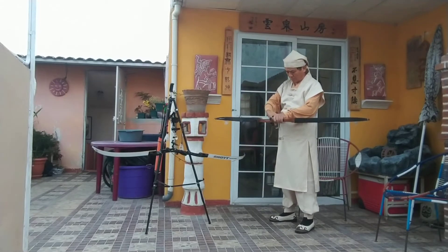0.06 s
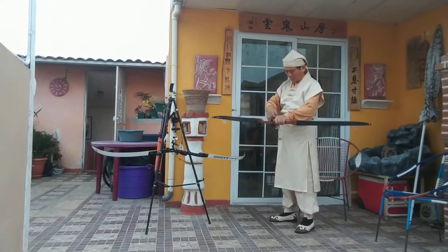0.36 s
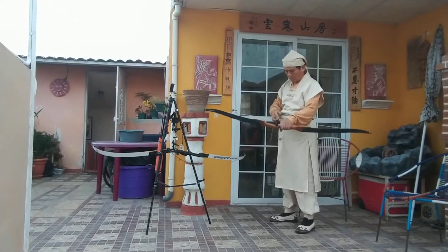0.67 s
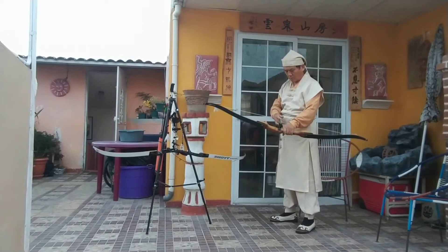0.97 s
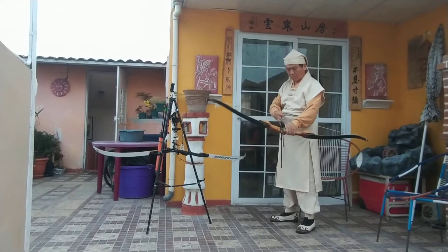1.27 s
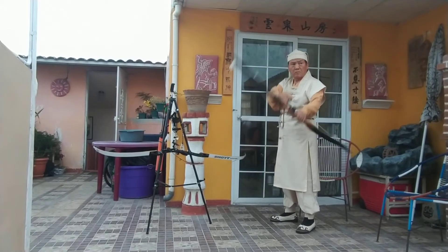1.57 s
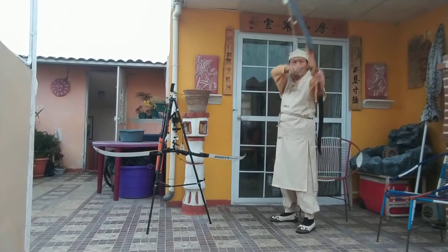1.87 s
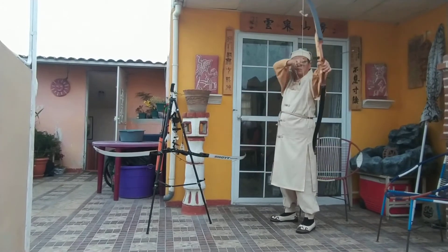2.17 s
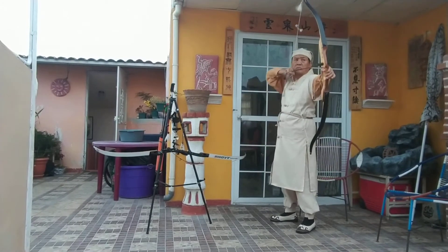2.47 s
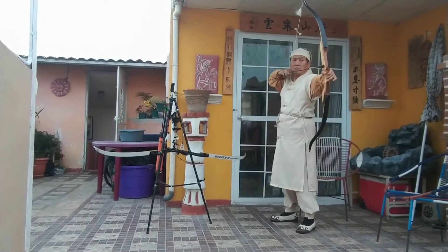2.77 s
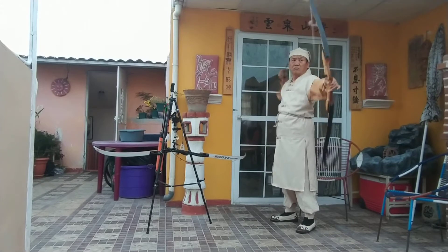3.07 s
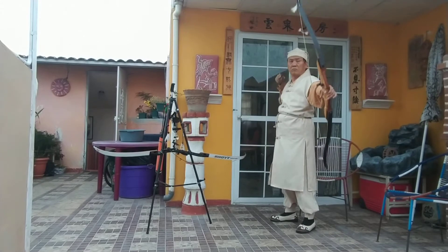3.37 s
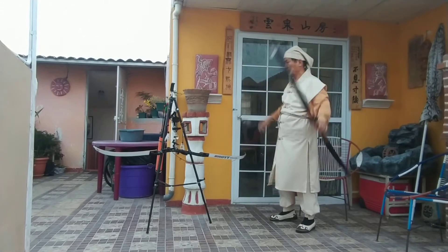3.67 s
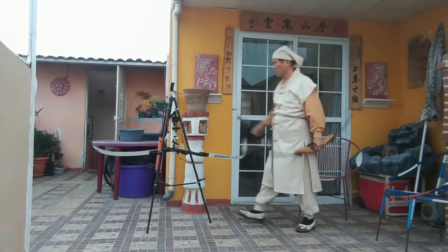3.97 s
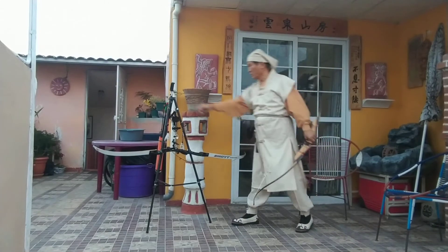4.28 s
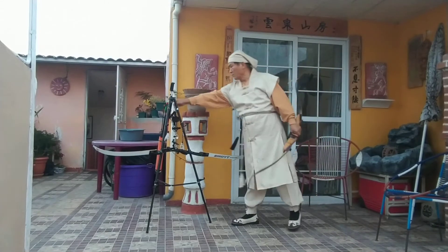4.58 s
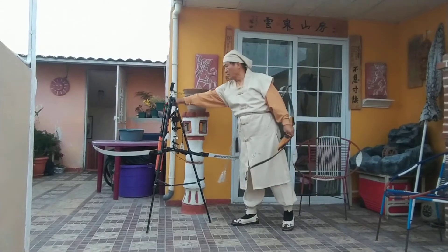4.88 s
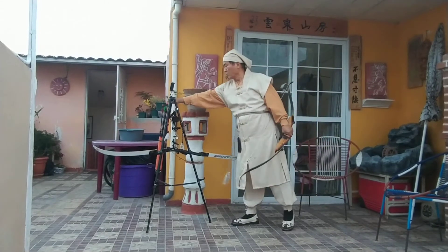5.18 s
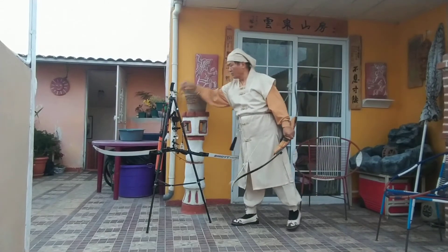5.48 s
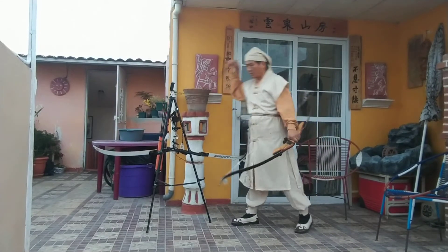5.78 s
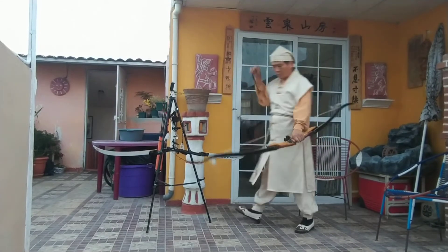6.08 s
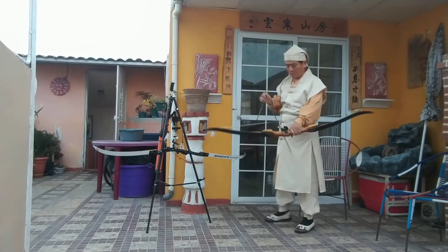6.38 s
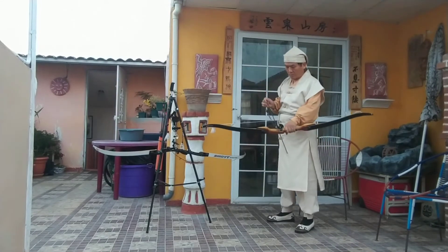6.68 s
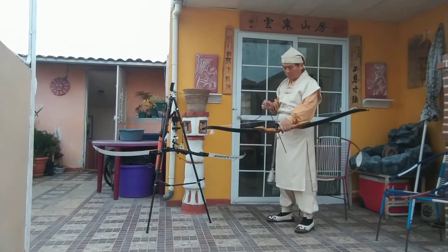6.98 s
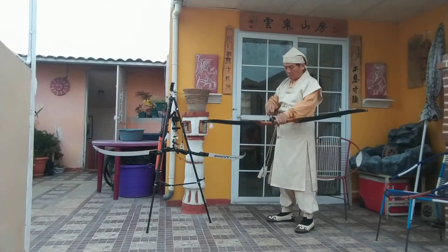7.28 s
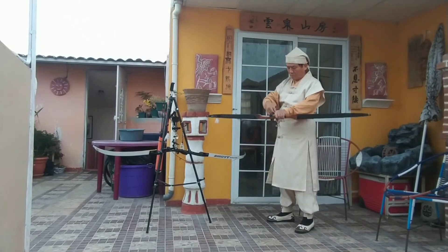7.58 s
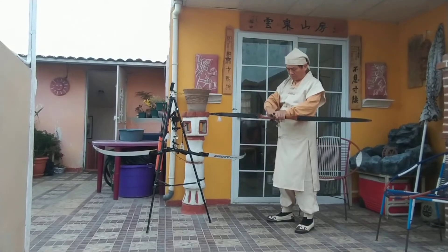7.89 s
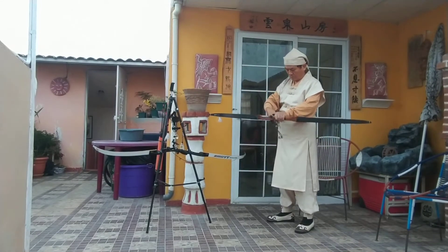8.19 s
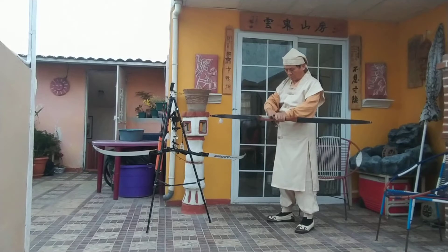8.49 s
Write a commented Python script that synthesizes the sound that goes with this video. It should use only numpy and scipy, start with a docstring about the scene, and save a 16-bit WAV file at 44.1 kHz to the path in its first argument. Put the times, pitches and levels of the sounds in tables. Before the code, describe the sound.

Wind buffets the microphone as a bow string snaps, an arrow thuds into a nearby target, and another arrow scrapes and clicks into place.

```python
"""Gusts buffet each microphone port in turn, over background hiss and rumble that drop abruptly at 6.3 s.
Sleeves brush a rising bow on a tiled, half-roofed patio; faint birds squawk and whistle beyond it.
The archer looses: the string slaps the limbs, the bow rings, the arrow thuds into a target close by.
The next arrow rubs out of its stand in tiny slips and clicks onto the bow, ringing shaft and grip."""
import sys
import numpy as np
from scipy import signal
from scipy.fft import rfft, irfft
from scipy.io import wavfile
from scipy.ndimage import uniform_filter1d

SR = 44100
rng = np.random.default_rng(int(sys.argv[2]) if len(sys.argv) > 2 else 0)


def file_out(sig):
    """Save sig as 16-bit WAV at sys.argv[1]."""
    # one column per channel
    cols = np.atleast_2d(sig).T
    # limit, then scale
    lim = np.clip(cols, -1, 1)
    pcm = np.round(lim * 32767).astype(np.int16)
    wavfile.write(sys.argv[1], SR, pcm)


N = 381024
TIME = np.arange(N) / SR


def from_db(db):
    """Decibels to gain."""
    return 10 ** (np.asarray(db) / 20)


def unit_rms(x):
    """Scale to unit rms."""
    return x / np.sqrt(np.mean(x ** 2) + 1e-20)


def decay(age_s, t60_s):
    """Exponential fall, 60 dB in t60_s."""
    return np.exp(-np.log(1000) * age_s / t60_s)


def in_time(rows):
    """Each column of a time curve at every sample."""
    times_s, *columns = np.transpose(rows)
    return [np.interp(TIME, times_s, column) for column in columns]


def swell_db(peak_s, hold_s, rise_db_per_s, fall_db_per_s):
    """Envelope: climbs to 0 dB at peak_s, holds, falls."""
    before_s, after_s = np.maximum(peak_s - TIME, 0), np.maximum(TIME - peak_s - hold_s, 0)
    return -rise_db_per_s * before_s - fall_db_per_s * after_s


def drift(rate_hz):
    """Random wander of unit rms."""
    knots = rng.standard_normal(4000)
    return unit_rms(np.interp(TIME * rate_hz, np.arange(len(knots)), knots))


def spectrum_db(points, hz):
    """Read a spectrum on a log axis; 20 dB/octave roll-off past its ends."""
    point_hz, db = np.transpose(points)
    octave, knots = np.log2(np.maximum(hz, 1)), np.log2(point_hz)
    outside = np.abs(octave - np.clip(octave, knots[0], knots[-1]))
    return np.interp(octave, knots, db) - 20 * outside


def colour(x, points, size=8192):
    """Minimum-phase filter with the given spectrum; white noise keeps its level."""
    gain = from_db(spectrum_db(points, np.fft.rfftfreq(size, 1 / SR)))
    cepstrum = irfft(np.log(gain))
    cepstrum[1:size // 2] *= 2
    cepstrum[size // 2 + 1:] = 0
    response = irfft(np.exp(rfft(cepstrum)))
    response /= np.sqrt(np.sum(response ** 2))
    return signal.oaconvolve(np.atleast_2d(x), response[None], axes=1)[:, :N]


def butter(x, hz, kind, order=2):
    """Butterworth filter."""
    return signal.sosfilt(signal.butter(order, hz, kind, fs=SR, output="sos"), x + 1e-18)


def resonate(x, modes):
    """Parallel two-pole resonances."""
    out = 0
    for hz, width_hz, db in modes:
        r = np.exp(-np.pi * width_hz / SR)
        feedforward = np.array([1, 0, -1]) * (1 - r * r) / 2
        feedback = [1, -2 * r * np.cos(2 * np.pi * hz / SR), r * r]
        out = out + from_db(db) * signal.lfilter(feedforward, feedback, x + 1e-18)
    return out


# background hiss and rumble: (time [s], level [dB], treble lift [dB])
BACKGROUND_LEVELS = [(0, -40, 4), (1.9, -42, 2.5), (2.3, -40.5, 7.5), (2.8, -37.5, 1), (4.5, -39, 4.5),
                     (6.23, -41, 5.5), (6.3, -46, -3.5), (7.4, -51.5, 7), (8.64, -49, 3)]
# (frequency [Hz], density [dB])
BACKGROUND_SPECTRUM = [(30, 3.5), (100, 10), (200, -2.5), (340, -4), (500, -10.5), (750, -18), (1300, -24),
                       (2400, -33), (4900, -41), (6300, -52), (9000, -52), (12000, -61)]

def background(treble_hz=3000, shared_below_hz=650):
    """Hiss and rumble, abruptly turned down at 6.3 s as by automatic gain control."""
    level_db, lift_db = in_time(BACKGROUND_LEVELS)
    mid, side = colour(rng.standard_normal((2, N)), BACKGROUND_SPECTRUM)
    noise = mid + butter(side, shared_below_hz, "high", order=1) * np.array([[1], [-1]])
    treble = butter(noise, treble_hz, "high", order=1)
    return from_db(level_db) * (noise + (from_db(lift_db) - 1) * treble)


def port_gains(pan_db):
    """Left and right gains of unit total power; pan is left minus right."""
    sides = from_db(np.array([pan_db, -pan_db]) / 2)
    return sides / np.sqrt(np.sum(sides ** 2, axis=0))


# breeze between gusts: (time [s], level [dB], pan [dB])
BREEZE_LEVELS = [(0, -32, -6), (.24, -36, -12), (.44, -17.5, 8), (1.21, -24.5, 1), (1.72, -16, -3),
                 (2.9, -24, -5.5), (4.42, -35.5, -7), (5.83, -33, -14), (6.25, -51.5, -5), (6.78, -44, -9),
                 (7.41, -44.5, -2), (8.64, -34.5, -12)]
# gusts: (peak time [s], hold [s], level [dB], pan [dB])
GUST_PEAKS = [(0.495, 0.28, -9, -15), (0.805, 0.17, -14, -5), (1.469, 0.052, -8, 8),
              (1.588, 0.046, -10, 2.5), (1.953, 0.23, -16.5, -2.5), (2.316, 0.016, -21.5, 10),
              (2.53, 0.15, -18, -6.5), (3.048, 0.27, -22.5, 1), (3.39, 0.053, -13, 14),
              (3.506, 0.057, -15.5, 8.5), (3.646, 0.026, -14, 14.5), (3.753, 0.07, -21, -9),
              (4.003, 0.24, -23, -9.5), (4.645, 0.016, -26, -5.5), (5.017, 0.025, -18.5, -3),
              (5.41, 0.13, -30, -16), (6.88, 0.096, -32.5, -2.5), (7.108, 0.12, -28.5, 14),
              (7.279, 0.011, -26.5, -8), (7.661, 0.11, -24.5, -14), (7.921, 0.058, -22.5, -13.5),
              (8.1, 0.13, -20, 25.5), (8.307, 0.064, -25, -5.5), (8.439, 0.021, -17, -4)]

def airflow_db(rise_db_per_s=173.5, fall_db_per_s=197.5, uneven_db=1.0):
    """Wind level per port: gusts ride on the breeze, and each port feels them unevenly."""
    breeze_db, breeze_pan_db = in_time(BREEZE_LEVELS)
    power = (from_db(breeze_db) * port_gains(breeze_pan_db)) ** 2
    for peak_s, hold_s, db, pan_db in GUST_PEAKS:
        shape_db = np.maximum(swell_db(peak_s, hold_s, rise_db_per_s, fall_db_per_s), -100)
        power += (port_gains(pan_db)[:, None] * from_db(db + shape_db)) ** 2
    return [10 * np.log10(port) + uneven_db * np.tanh(drift(14)) for port in power]


# how bright or dull the wind rumble sounds: (time [s], frequency scale [ratio])
WIND_BRIGHTNESS = [(0, 0.86), (.7, 0.89), (1.5, 1.294), (2.2, 0.79), (3.5, 0.93), (4.3, 0.61), (5, 0.68),
                   (6.5, 0.83), (8.2, 0.76), (8.64, 0.49)]
# rumble at unit speed: (frequency [Hz], density [dB])
RUMBLE_SPECTRUM = [(10, 8), (70, 4), (113, 1.5), (196, -7), (286, -13.5), (404, -28.5), (570, -44),
                   (810, -54.5), (1160, -57.5)]

def wind(unit_speed_db=-18, db_per_doubling=19, calm_speed=.68, flutter_db=1.5, swirls_per_s=240):
    """Each port has its own swirls; a stronger gust is louder and sheds smaller, faster ones."""
    edges_hz = 18 * 2 ** np.arange(0, 6.6, .5)
    brightness, = in_time(WIND_BRIGHTNESS)
    hop, out = 64, []
    for level_db in airflow_db():
        speed = np.maximum(2 ** ((level_db - unit_speed_db) / db_per_doubling), calm_speed)
        speed *= brightness * from_db(flutter_db * np.tanh(drift(60)))
        swirls = unit_rms((rng.random(N) < swirls_per_s / SR) * rng.standard_normal(N))
        turbulence = swirls + .35 * rng.standard_normal((2, N))
        rumble = 0
        for k, (low_hz, high_hz) in enumerate(zip(edges_hz, edges_hz[1:])):
            density_db = spectrum_db(RUMBLE_SPECTRUM, np.sqrt(low_hz * high_hz) / speed[::hop])
            gain = from_db(density_db) * np.sqrt(high_hz - low_hz)
            band = unit_rms(butter(turbulence[k % 2], [low_hz, high_hz], "band"))
            rumble += (-1) ** k * np.interp(TIME, TIME[::hop], gain) * band   # signs smooth the joins
        rumble = butter(rumble, 44, "high", order=3)
        rumble = butter(rumble, 720, "low", order=4)
        power = uniform_filter1d(uniform_filter1d(rumble ** 2, size=2400), size=1200)
        out.append(from_db(level_db + .5) * rumble / np.sqrt(power))   # airflow alone sets loudness
    return np.array(out)


# sharp eddies: (time [s], peak [dB], pan [dB], width [s])
SHARP_EDDIES = [(0.471, -8.5, -10, 0.0018), (0.512, -5.5, -30, 0.0011), (0.56, -3.5, -27, 0.0012),
                (0.669, 0.5, -14, 0.0017), (0.713, -7, -37, 0.0014), (0.741, -13, -14.5, 0.0031),
                (.813, -8, -23.5, 0.0016), (0.852, -4.5, -20, 0.002), (1.423, -14, -7, 0.0015),
                (1.448, -5, 13, 0.001), (1.487, 0, 24, 0.00085), (1.509, -13, 15, 0.00087),
                (1.572, -10.5, 10, .0013), (1.627, -9, -32.5, 0.00086), (1.952, -17, -3.5, 0.0016),
                (2.147, -11, -17, 0.0012), (2.324, -12.5, 1, 0.003), (2.584, -10, -19, 0.0014),
                (3.41, -8, 25, 0.0018), (3.449, -3.5, 21, 0.002), (3.53, -7.5, -24, 0.002),
                (4.046, -12, -17, 0.0036), (4.211, -18, -17, 0.0027), (5.004, -15.5, -20, 0.0024),
                (5.015, -19, -7, 0.0017), (7.712, -17, -17, .003), (7.913, -19, -13, 0.0032),
                (8.196, -14.5, 18, 0.0023), (8.445, -12, -7, 0.0033)]

def eddies(wake_count=6, gap_s=0.008, wake_db=-14, loss_db=2, spread_db=3.0):
    """An eddy crosses a port as one push and pull of pressure, trailed by a wake of smaller ones."""
    out = np.zeros((2, N))
    for at_s, db, pan_db, lead_width_s in SHARP_EDDIES:
        delays_s = np.cumsum(gap_s * rng.uniform(.3, 1.7, wake_count))
        signs = rng.choice([-1, 1], wake_count)
        sizes_db = wake_db - loss_db * np.arange(wake_count) + spread_db * rng.standard_normal(wake_count)
        widths_s = lead_width_s * rng.uniform(.6, 1.1, wake_count)
        wake = zip(delays_s, signs * from_db(sizes_db), widths_s)
        for delay_s, size, width_s in [(0, 1, lead_width_s), *wake]:
            start = int((at_s + delay_s - .04) * SR)
            span = slice(start, start + SR // 12)
            position = (TIME[span] - at_s - delay_s) / width_s - 2
            pulse = np.pi * position / (1 + position ** 2) ** 2
            out[:, span] += port_gains(pan_db)[:, None] * size * from_db(db) * pulse
    return out


def buffeting(ceiling=.97):
    """The strongest gusts overload the ports softly and stay dull."""
    pressure = wind() + eddies()
    clipped = pressure / (1 + (pressure / ceiling) ** 6) ** (1 / 6)
    return butter(clipped, 1650, "low", order=6)


# sleeve brushing: (time [s], level [dB])
CLOTH_LEVELS = [(.7, -89.5), (.83, -62), (.95, -70), (1.15, -66), (1.33, -65.5), (1.55, -74)]
# (frequency [Hz], density [dB])
CLOTH_SPECTRUM = [(1200, -13), (2600, 0.5), (3700, -1), (4500, -8), (6000, -22.5)]

def cloth(uneven_db=8.0):
    """Sleeves and fingers brush the bow as it is raised."""
    active = (TIME >= CLOTH_LEVELS[0][0]) & (TIME <= CLOTH_LEVELS[-1][0])
    gate = uniform_filter1d(1. * active, size=600)
    level_db = in_time(CLOTH_LEVELS)[0] + uneven_db * np.tanh(drift(40))
    return gate * from_db(level_db) * colour(rng.standard_normal(N), CLOTH_SPECTRUM)


def song(notes, tones, scoop, flutter_db, scoop_s=.04):
    """Each note scoops up to pitch under an arch of loudness; every tone wavers on its own."""
    out = np.zeros(N)
    for multiple, tone_db, scoop_share, roughness in tones:
        waver = 1 + roughness * drift(400)
        flutter = from_db(flutter_db * drift(30))
        for at_s, length_s, hz, db in notes:
            on = (TIME >= at_s) & (TIME < at_s + length_s)
            age_s = TIME[on] - at_s
            glide = 1 - scoop_share * scoop * np.exp(-age_s / scoop_s)
            phase = 2 * np.pi * np.cumsum(multiple * hz * glide * waver[on]) / SR
            arch = np.sin(np.pi * age_s / length_s)
            out[on] += from_db(db + tone_db) * flutter[on] * arch * np.sin(phase)
    return out


# hoarse call: (time [s], length [s], pitch [Hz], level [dB], overtone lift [dB])
SQUAWK_NOTES = [(0.98, 0.077, 1630, -74.5, 10), (1.12, .075, 1630, -72, 10),
                (1.247, 0.077, 1786, -57.5, -2), (1.314, 0.068, 1755, -66, 9),
                (1.365, 0.062, 1764, -59.5, 0)]
# its tones: (pitch multiple [ratio], level [dB], scoop share [ratio], roughness [ratio])
SQUAWK_PARTIALS = [(0.999, 6, 0.94, 0.026), (1.83, -15, 0.51, 0.015), (2.34, -10, .1, .015),
                   (2.46, -8, 0.11, 0.016)]
# thin whistles farther off: (time [s], length [s], pitch [Hz], level [dB])
WHISTLE_NOTES = [(2.39, 0.15, 3690, -70), (2.51, 0.12, 3730, -71), (2.63, 0.11, 3790, -68),
                 (2.64, 0.13, 2920, -68.5), (2.75, 0.18, 3760, -71), (3.25, 0.33, 2460, -71),
                 (3.65, 0.44, 2420, -70.5), (8.32, 0.23, 2396, -66), (8.36, 0.084, 2400, -60),
                 (8.47, 0.22, 2435, -57.5)]

def birds():
    """One hoarse call of several syllables, then runs of clear whistles."""
    notes = [row[:4] for row in SQUAWK_NOTES]
    lifted = [(at_s, length_s, hz, db + lift_db) for at_s, length_s, hz, db, lift_db in SQUAWK_NOTES]
    fundamental = song(notes, SQUAWK_PARTIALS[:1], scoop=.11, flutter_db=2.5)
    overtones = song(lifted, SQUAWK_PARTIALS[1:], scoop=.11, flutter_db=2.5)
    whistles = song(WHISTLE_NOTES, [(1, 0, 1, .003)], scoop=.025, flutter_db=1.8)
    return fundamental + overtones + whistles


def grit(shared=0.44):
    """Noise at the two ports, largely scrambled by nearby walls."""
    white = rng.standard_normal((3, N))
    return np.sqrt(shared) * white[0] + np.sqrt(1 - shared) * white[1:]


def blows(rows, rise_s=0.0011):
    """Gritty contact force: each blow builds over its rise time and dies away."""
    power = np.zeros(N)
    for (at_s, db, t60_s), ramp_s in zip(rows, np.broadcast_to(rise_s, len(rows))):
        start = int(at_s * SR)
        age_s = TIME[:min(SR // 2, N - start)]
        envelope = from_db(db) * np.minimum(age_s / ramp_s, 1) * decay(age_s, t60_s)
        power[start:start + len(age_s)] += envelope ** 2
    return np.sqrt(power) * grit()


def contacts(rows, width_hz=220, t60_s=0.041):
    """Each touch rings briefly at a pitch set by where it lands."""
    out, age_s = np.zeros((2, N)), TIME[:SR // 5]
    for at_s, hz, db in rows:
        ring = unit_rms(resonate(rng.standard_normal((2, len(age_s))), [(hz, width_hz, 0)]))
        start = int(at_s * SR)
        out[:, start:start + len(age_s)] += from_db(db) * ring * decay(age_s, t60_s)
    return out


# string release, then limb slaps: (time [s], level [dB], t60 [s], contact pitch [Hz], contact ring [dB])
STRING_SLAPS = [(2.907, -31.5, 0.14, 1400, -24.5), (2.919, -25, 0.046, 2600, -23),
                (2.9219, -5, 0.0261, 2980, -16), (2.926, -10, 0.018, 4250, -20),
                (2.935, -21.5, 0.027, 5300, -19), (2.947, -24, 0.07, 4900, -16)]
# (frequency [Hz], density [dB])
SNAP_SPECTRUM = [(120, -8.5), (300, 5), (470, 3.5), (610, -8), (800, 1.5), (1200, -6), (1550, -2.5),
                 (2500, -0.5), (4300, -4), (5600, -4.5), (6500, -15), (8200, -8), (10500, -16.5),
                 (12000, -25.5)]
# bow and arrow resonances: (frequency [Hz], width [Hz], gain [dB])
BOW_MODES = [(804, 82, -6.5), (1560, 32, 9.5), (2272, 43, -1), (2400, 130, -7.5), (2980, 81, -4),
             (3483, 48, -23), (4360, 40, -2), (4400, 68, 8.5), (5000, 46, 0.5), (4670, 60, -4),
             (5710, 110, -9.5), (8400, 91, -5.5), (9930, 94, -22), (10230, 87, -14.5)]

def bow_snap(ring_db=-7.0):
    """String and arrow slap the bow in a quick cluster, rising in pitch, and set it ringing."""
    crack = colour(blows([row[:3] for row in STRING_SLAPS]), SNAP_SPECTRUM)
    slaps = contacts([(at_s, hz, db) for at_s, _, _, hz, db in STRING_SLAPS])
    return crack + slaps + from_db(ring_db) * resonate(crack, BOW_MODES)


# blows on the target's face and butt: (time [s], level [dB], t60 [s])
FACE_BLOWS = [(3.071, -26.5, 0.034), (3.096, -58.5, 0.14)]
BUTT_BLOWS = [(3.0812, 1, 0.016), (3.098, -24.5, 0.12)]
# arrow contact (also for shaft knocks) and butt thud: (frequency [Hz], density [dB])
KNOCK_SPECTRUM = [(400, 11), (1000, 5), (1700, 4.5), (2500, 2.5), (4000, 3), (5300, 1), (6500, -6.5),
                  (9000, -7), (12000, -21)]
THUD_SPECTRUM = [(90, 1), (220, -3.5), (400, 0.5), (600, -12.5), (900, -15.5), (1400, -28), (2400, -41),
                 (5000, -56)]

def target_hit():
    """The arrow tears the face with a tick; the butt gives with a dull thud."""
    tick = colour(blows(FACE_BLOWS, rise_s=0.002), KNOCK_SPECTRUM)
    thud = colour(blows(BUTT_BLOWS), THUD_SPECTRUM)
    return tick + thud


# shaft on stand and bow: (time [s], level [dB], treble offset [dB], rise [s], shaft offset [dB],
# grip offset [dB], contact pitch [Hz], contact ring [dB])
SHAFT_KNOCKS = [(3.602, -51, 2.5, .0027, 4, 3, 3100, -62), (3.707, -56, -2, .0016, -6, 15, 5640, -52),
                (4.181, -43, -1, 0.00047, 1, -8, 5000, -54), (4.219, -47.5, -14, 0.00076, 9, 5, 2380, -46),
                (4.922, -41.5, 7, .0014, 4, 4, 3300, -57), (5.009, -46, 5, .001, -4, -1, 4170, -47),
                (5.06, -55, -2, 0.0022, 0, 0, 1530, -40), (5.146, -51, -4, .001, 2, 7, 4400, -48),
                (5.322, -45, 6, .002, -7, -5, 3800, -50), (5.384, -54, 0, .002, 0, 0, 1280, -41),
                (5.429, -37, 11.5, 0.006, -2, 1, 1280, -36.5), (5.49, -34, 9.5, 0.0028, -3, 9, 3630, -32),
                (5.513, -32, 14.5, 0.0077, 0, 8, 4200, -33), (5.711, -38.5, 11, .0048, -7, -6, 6900, -43.5),
                (6.346, -40.5, -23, 0.0032, 0.5, -6.5, 1600, -43),
                (6.412, -40, -14, 0.0096, 7, 5, 1380, -40.5),
                (6.437, -30.5, -18, 0.0072, -10, 11, 4370, -36.5),
                (6.449, -32.5, -7, 0.0058, -4, 18.5, 2550, -44),
                (6.539, -41.5, -23, 0.0012, 6, 17.5, 2570, -44.5),
                (6.83, -42, 10.5, 0.0046, 6, -8, 4700, -47), (6.836, -48, 5, .002, 0, 2, 4990, -37),
                (6.845, -37.5, 1, .004, 8, 11, 3500, -43.5), (6.909, -47, -12, 0.0035, -2, 7, 4700, -51),
                (6.926, -42.5, -25, 0.0016, 5, 7, 2450, -50), (6.972, -61, -21, 0.0016, 23, 10, 2120, -52),
                (7.186, -36.5, 2, 0.017, 4, 5, 2990, -62), (7.207, -43, 3, 0.0094, 3, 3, 3010, -63)]
# shaft and bow grip resonances: (frequency [Hz], width [Hz], gain [dB])
SHAFT_MODES = [(2100, 55, 14), (2510, 100, 1.5), (3220, 90, 8.5), (3590, 53, 8), (5120, 140, -9)]
GRIP_MODES = [(2440, 42, 12), (2900, 100, -24), (3610, 160, 0.5), (4200, 200, -10)]

def shaft_knocks(t60_s=0.03, treble_hz=5850, scrape_db=4.5):
    """Light knocks ring shaft and grip; each has its own brightness, from dull tap to bright scrape."""
    times_s, db, treble_db, rise_s, shaft_db, grip_db, touch_hz, touch_db = np.transpose(SHAFT_KNOCKS)

    def force(offset_db):
        return blows([(at_s, level_db, t60_s) for at_s, level_db in zip(times_s, db + offset_db)], rise_s)

    body = butter(colour(force(0), KNOCK_SPECTRUM), treble_hz, "low", order=6)
    edge = butter(colour(force(treble_db), KNOCK_SPECTRUM), treble_hz, "high", order=4)
    rings = resonate(force(shaft_db), SHAFT_MODES) + resonate(force(grip_db), GRIP_MODES)
    touches = contacts(zip(times_s, touch_hz, touch_db))
    return from_db(scrape_db) * (body + edge) + rings + touches


# strokes drawing the arrow out: (peak time [s], level [dB], 20 dB rise [s], 20 dB fall [s])
SLIDE_STROKES = [(4.85, -58.5, 0.21, 0.28), (4.929, -42.5, 0.036, 0.047), (5.019, -46, 0.019, 0.24),
                 (5.18, -59.5, 0.092, 1), (5.35, -50.5, 0.05, 0.24), (5.456, -37.5, 0.14, 0.2),
                 (5.515, -41, 0.05, 0.26), (5.72, -48.5, 0.091, 0.19), (5.93, -56, 0.037, 0.026),
                 (5.98, -54.5, 0.015, 0.072)]
# (frequency [Hz], density [dB])
SLIDE_SPECTRUM = [(350, -27), (600, -29), (639, -7.5), (781, -5), (1280, -4.5), (1730, -14), (1860, -6.5),
                  (3320, -13.5), (4370, -5), (6380, -17.5), (7420, -11.5), (11500, -28), (12100, -33),
                  (15700, -59), (22000, -120)]
# stand resonances: (frequency [Hz], width [Hz], gain [dB])
STAND_MODES = [(1160, 78, -6), (1800, 110, 4), (3080, 96, 13), (3710, 130, 10), (4360, 170, 2.5),
               (5600, 57, 5), (7350, 190, -3)]

def arrow_slide(slips_per_s=650, uneven_db=4.0, wander=0.055):
    """Shaft and feathers slip past other arrows; the stand's resonances wander as the contact moves."""
    slips = (rng.random(N) < slips_per_s / SR) * grit()
    rub = colour(slips * from_db(uneven_db * drift(70)), SLIDE_SPECTRUM)
    warped_s = np.cumsum(1 + wander * drift(14)) / SR
    stand = np.array([np.interp(warped_s, TIME, port) for port in resonate(rub, STAND_MODES)])
    strokes_db = [db + swell_db(peak_s, 0, 20 / rise_s, 20 / fall_s)
                  for peak_s, db, rise_s, fall_s in SLIDE_STROKES]
    return from_db(np.max(strokes_db, axis=0)) * unit_rms(rub + .5 * stand)


def patio(x, direct_db=-4.0, wet_db=-2.0, t60_s=0.25, treble_t60_s=0.16, treble_hz=6500, build_s=0.0021):
    """Direct sound, then dense reflections from walls, tiles and roof, different at each port."""
    age_s = TIME[:SR // 2]
    scatter = rng.standard_normal((2, len(age_s)))
    tail = butter(scatter, treble_hz, "low", order=1) * decay(age_s, t60_s)
    tail += butter(scatter, treble_hz, "high", order=1) * decay(age_s, treble_t60_s)
    tail *= 1 - np.exp(-age_s / build_s)
    tail /= np.sqrt(np.sum(tail ** 2, axis=1, keepdims=True))
    return from_db(direct_db) * x + from_db(wet_db) * signal.fftconvolve(x, tail, axes=1)[:, :N]


def scene():
    """Archer on the patio, birds beyond it, background noise, wind on the microphone itself."""
    archer = bow_snap() + target_hit() + shaft_knocks() + arrow_slide() + cloth()
    return patio(archer) + birds() + background() + buffeting()


def record(dry):
    """Steep low-pass at 12 kHz."""
    return signal.sosfilt(signal.ellip(10, .1, 80, 12000, fs=SR, output="sos"), dry)


dry = scene()
out = record(dry)
file_out(out)
```